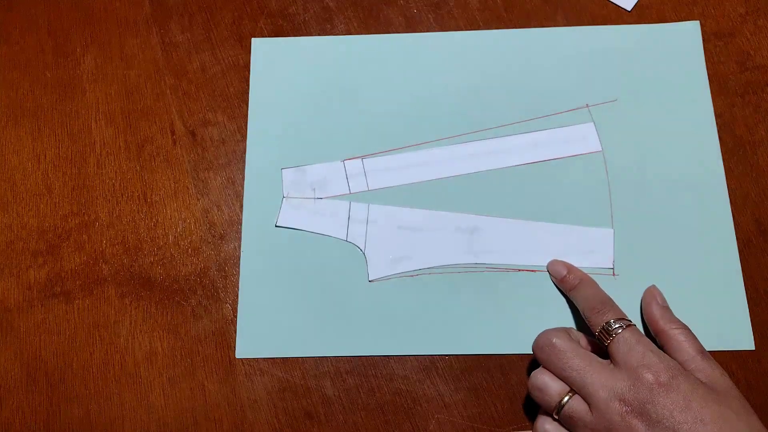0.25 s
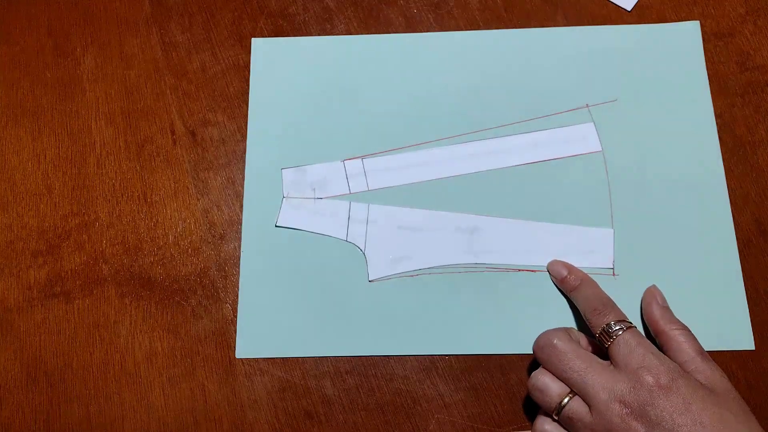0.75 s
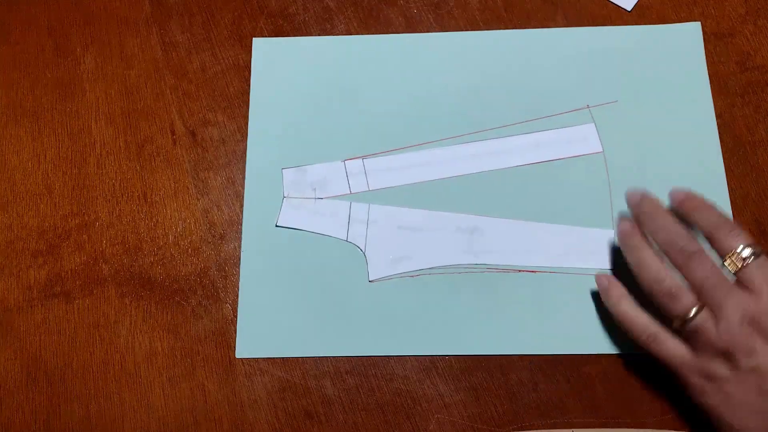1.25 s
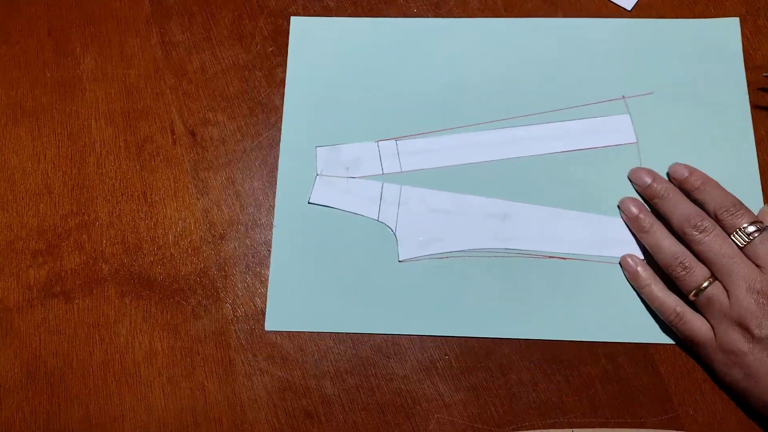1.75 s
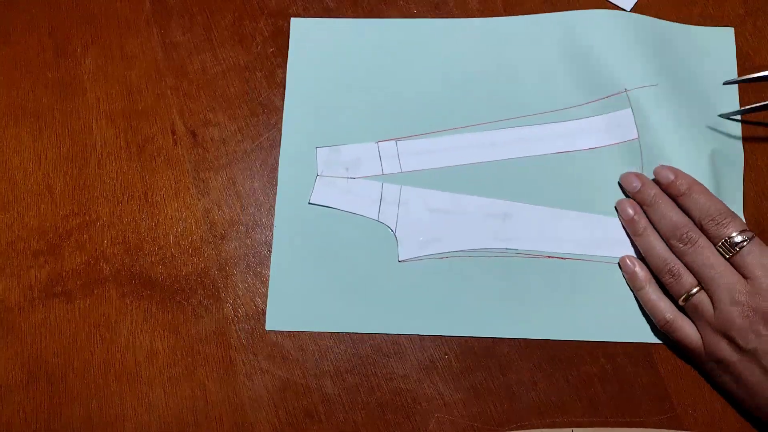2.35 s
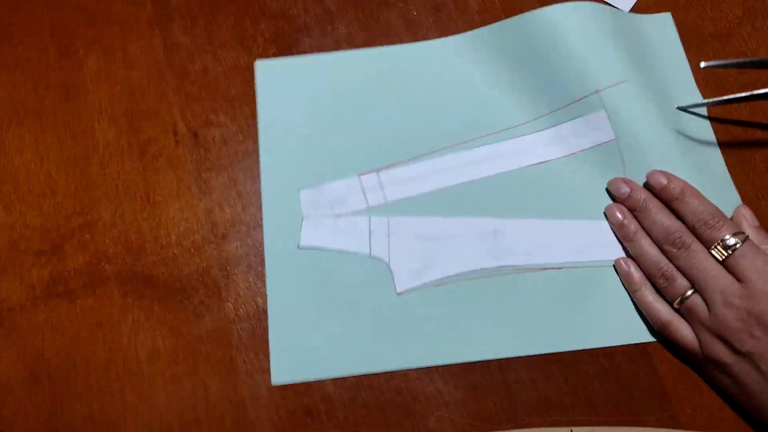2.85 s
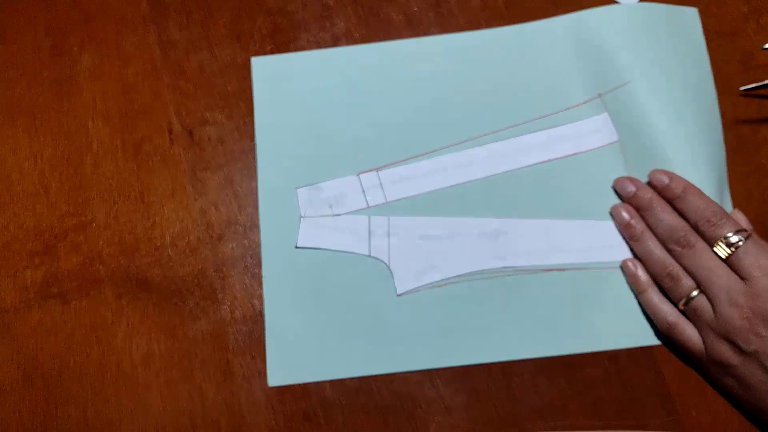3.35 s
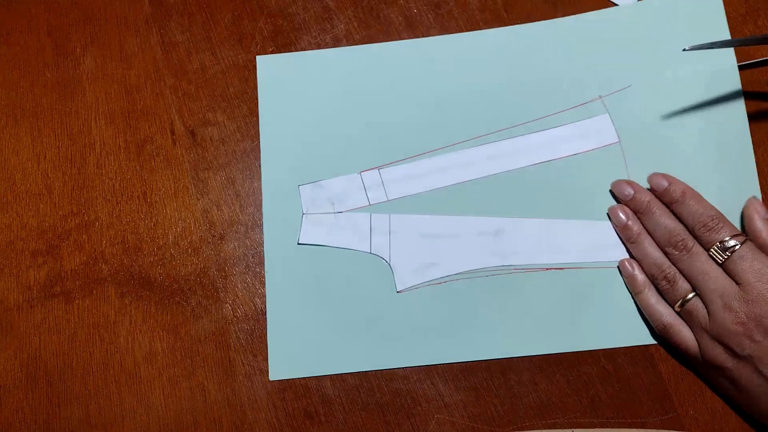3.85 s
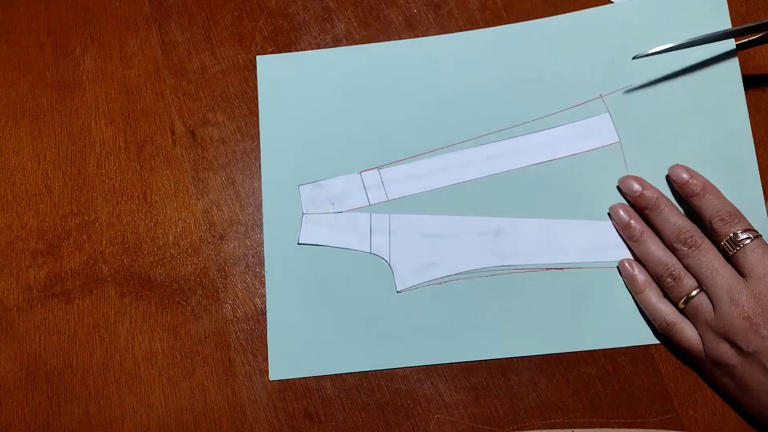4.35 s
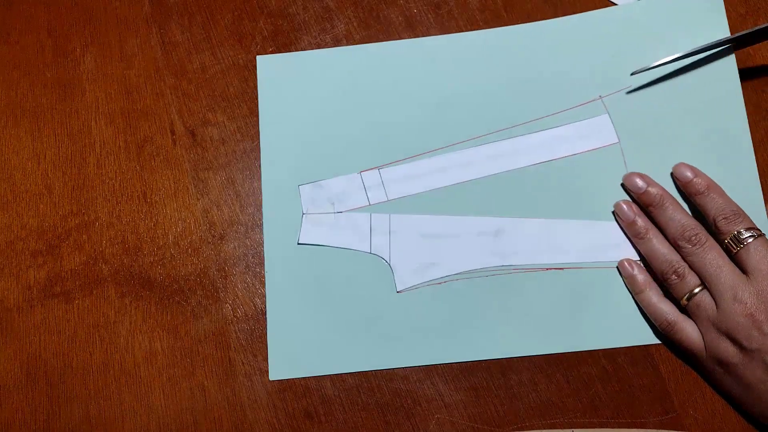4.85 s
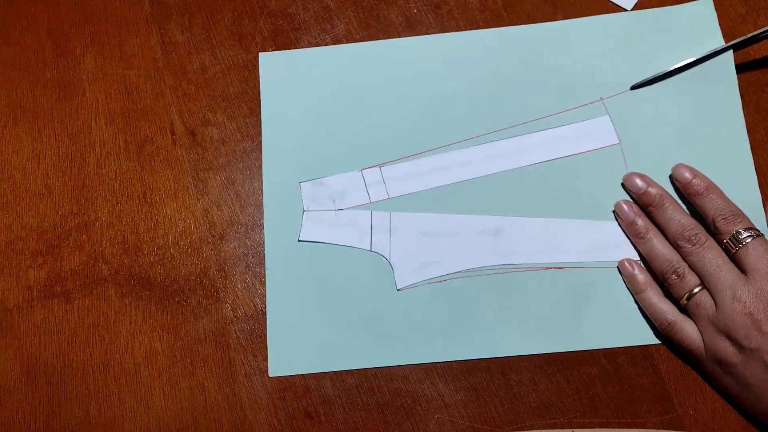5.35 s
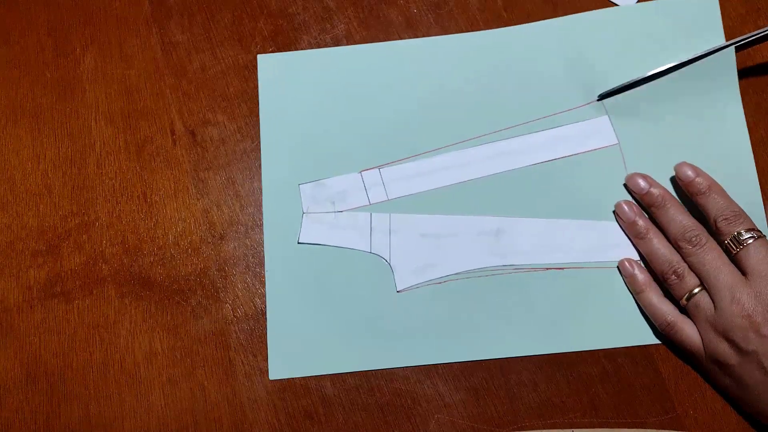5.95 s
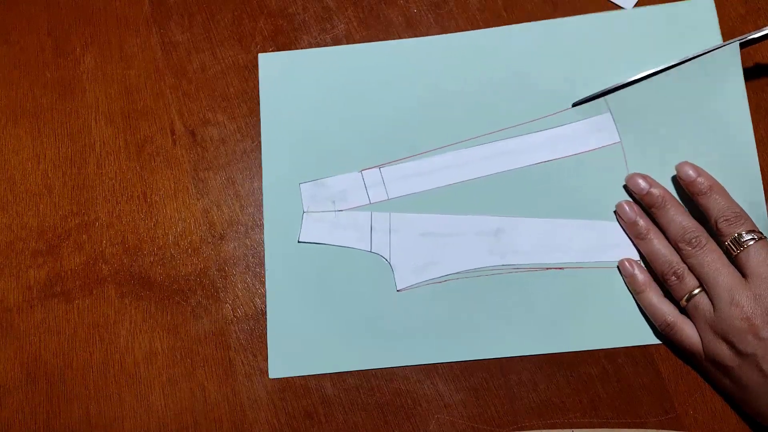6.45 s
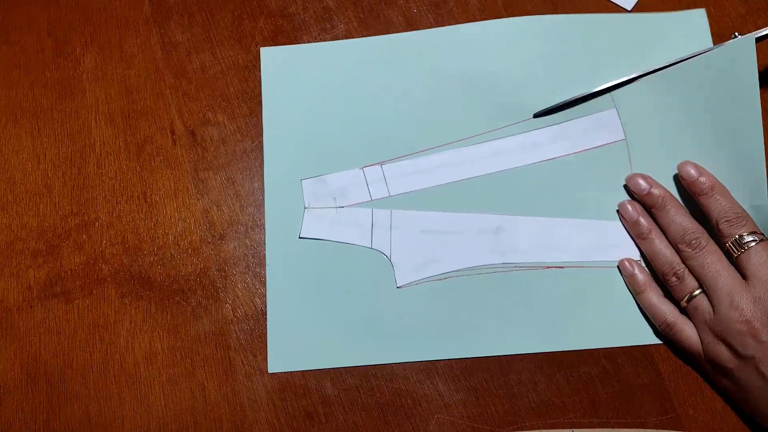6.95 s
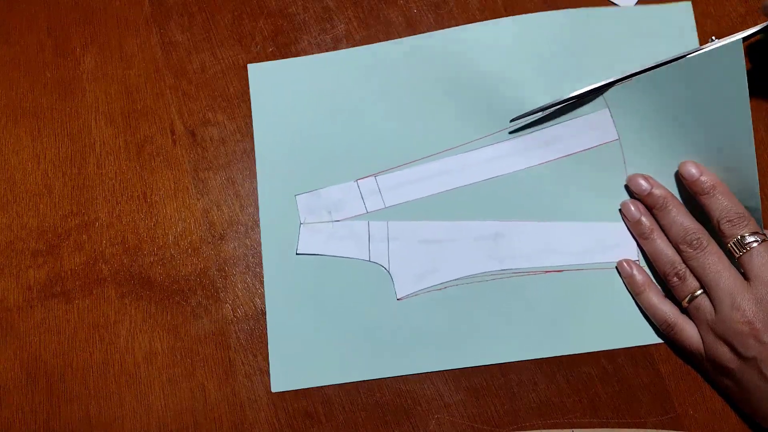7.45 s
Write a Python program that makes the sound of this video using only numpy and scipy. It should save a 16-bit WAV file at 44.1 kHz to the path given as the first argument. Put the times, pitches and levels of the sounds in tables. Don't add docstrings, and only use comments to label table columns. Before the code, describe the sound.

Light knocks and a faint metal clink, papery rustles and a snapping flick, then five spaced scissor snips through stiff paper, close up.

```python
import sys
import numpy as np
from scipy import signal
from scipy.fft import rfft, irfft, next_fast_len
from scipy.io import wavfile

SR = 44100
rng = np.random.default_rng(int(sys.argv[2]) if len(sys.argv) > 2 else 0)


def decibels_to_gain(level_db):
    exponent = np.asarray(level_db, float) / 20
    return 10 ** exponent


def unload_wav(signal):
    wavfile.write(
        sys.argv[1],
        SR,
        np.round(np.clip(np.atleast_2d(signal).T, -1, 1) * 32767).astype(np.int16),
    )


N = 339129
CUT_STARTS_S = 4.7

# frequency [Hz], width [Hz], level [dB].
TABLE_MODES = [(117.7, 12.8, -1), (182, 29, -4), (255.3, 25.4, -0.5), (354, 67, 0.5), (505, 108, -5.5),
               (728, 54, -5.5)]
# frequency [Hz], width [Hz], level [dB].
GRIPPED_MODES = [(983, 260, -2), (1074, 206, 2), (1343, 146, 4.5), (1587, 284, -1.5)]
# frequency [Hz], width [Hz], level [dB].
LOOSE_MODES = [(945, 190, 6.5), (1390, 740, 7), (1843, 330, 13)]
# frequency [Hz], width [Hz], level [dB].
SCRAPE_MODES = [(2140, 2130, -1), (3650, 1970, 5), (5550, 8100, -14)]
# frequency [Hz], width [Hz], level [dB].
FIBRE_MODES = [(7020, 3070, -3), (7980, 1550, 2.5), (9600, 1310, 0.5), (11220, 1300, -0.5),
               (12530, 3800, -10.5)]


def unit(x):
    return x / np.sqrt(np.mean(x ** 2))


def on_log(hz, table):
    f, v = np.transpose(table)
    return np.interp(np.log(np.maximum(hz, 1)), np.log(f), v)


def ports(pan_db):
    return decibels_to_gain(np.multiply.outer([1, -1], np.atleast_1d(pan_db)) / 2)


def body(x, modes):
    def ring(v):
        total = 0
        for k, (hz, width_hz, db) in enumerate(modes):
            b, a = signal.iirpeak(hz, hz / width_hz, SR)
            total = total + (-1) ** k * decibels_to_gain(db) * signal.lfilter(b, a, v)
        return total
    impulse = np.eye(1, 8192)[0]
    return ring(x) / np.sqrt(np.sum(ring(impulse) ** 2))


def grains(rate_hz, spread_db, tail_ms, bed, alike):
    sizes = decibels_to_gain(spread_db * np.minimum(rng.exponential(size=N), 4))
    slips = (rng.random(N) < rate_hz / SR) * sizes
    puffs = signal.lfilter([1], [1, -np.exp(-1e3 / (tail_ms * SR))], slips)
    both, own = rng.standard_normal(N), rng.standard_normal((2, N))
    noise = np.sqrt(alike) * both + np.sqrt(1 - alike) * own
    return unit((bed + unit(puffs)) * noise)


def patchy(parts, depth_db, swells_hz):
    walks = rng.standard_normal((len(parts), int(N / SR * 40)))
    place = np.arange(N) / SR * swells_hz
    total = 0
    for part, walk in zip(parts, walks):
        total = total + part * decibels_to_gain(depth_db * np.interp(place, np.arange(len(walk)), walk))
    return total


def strokes(rows, mix, form):
    onset_ms = 4
    bright_share = np.array((-0.63, -2.55, 0.72, 1))[:, None]
    ms = np.arange(N * 1000 // SR + 1)
    level_db, late_ms, rise_db, fall_db = np.transpose(mix)[:, :, None]
    square, top_pan_db, end_pan_db = form
    power, pan = 0, 0
    for start_s, rise_ms, fall_ms, db, bright_db in rows:
        since = ms - 1e3 * start_s
        top = np.maximum(rise_ms + late_ms, 1)
        to_go = np.clip(1 - since / top, 0, 1)
        fallen = np.maximum(since - top, 0) / fall_ms
        swell_db = -np.abs(rise_db) * to_go ** square - np.abs(fall_db) * fallen ** square
        gain = decibels_to_gain(db + level_db + bright_db * bright_share + swell_db)
        part = (gain * np.clip(1 + since / onset_ms, 0, 1)) ** 2
        power = power + part
        pan = pan + part * (top_pan_db + (end_pan_db - top_pan_db) * np.minimum(fallen, 1))
    return np.array([power, pan])


def background():
    # frequency [Hz], density [dB per Hz].
    air_db = [(2, 4.5), (6, 9), (15, 5), (30, -11.5), (60, -5), (95, -12.5), (180, -13.5), (300, -19.5),
              (700, -26), (2400, -35.5), (4850, -37), (10300, -34.5), (14000, -38.5), (16500, -65)]
    # frequency [Hz], likeness [0-1].
    air_alike = [(10, 0.17), (100, 0.56), (400, 0.33), (1500, 0), (16000, 0)]
    # frequency [Hz], level [dB].
    hum_tones = [(59.2, -48.5), (118.4, -58), (177.6, -57), (473.7, -65), (710.6, -68.5), (1244, -73.5),
                 (1954, -79.5), (3370, -79), (3908, -77)]
    hz = np.arange(N // 2 + 1) * SR / N
    alike = on_log(hz, air_alike)
    noise = rfft(rng.standard_normal((2, N))) * decibels_to_gain(on_log(hz, air_db))
    mid, side = noise * np.sqrt([1 + alike, 1 - alike])
    air = unit(irfft(np.array([mid + side, mid - side]), N)) * decibels_to_gain(-41.53)
    t, hum = np.arange(N) / SR, 0
    for (f, db), waver in zip(hum_tones, rng.standard_normal((len(hum_tones), 80))):
        swing = np.interp(t, np.linspace(0, t[-1], len(waver)), waver)
        hum = hum + decibels_to_gain(db + 3 + 0.8 * swing) * np.sin(2 * np.pi * f * t + f / 600 * swing)
    return air + hum


def room(x):
    # frequency [Hz], decay time t60 [s], level [dB].
    decay = np.array([(199, 0.52, -2), (820, 0.81, -2.5), (2440, 0.64, -2.5), (6700, 0.58, -6),
                      (12900, 0.38, -7.5)])
    t, step = np.arange(SR * 3 // 4) / SR, SR // 2
    starts = range(0, N, step)
    mid, side = rng.standard_normal((2, len(starts), 1, len(t)))
    tail = 0
    for hz in 60 * 2.0 ** np.arange(9):
        edges_hz = [hz / 2 ** 0.5, min(hz * 2 ** 0.5, 20000)]
        band = signal.butter(2, edges_hz, "bandpass", fs=SR, output="sos")
        pair = mid + min((hz / 660) ** 2, 1) * side * np.array([[1], [-1]])
        fade_db = on_log(hz, decay[:, ::2]) - 60 * t / on_log(hz, decay[:, :2])
        tail = -tail + signal.sosfilt(band, pair) * decibels_to_gain(fade_db)
    tail = tail * np.clip((t - 0.004) / 0.001, 0, 1)
    tail = tail / np.sqrt(SR * 0.047)
    out = np.zeros((2, N + SR * 2))
    for at, answer in zip(starts, tail):
        block = x[:, at:at + step].mean(axis=0)[None]
        part = signal.fftconvolve(block, answer, axes=1)
        out[:, at:at + part.shape[1]] += part
    return out[:, :N]


def left_late(x):
    lag_ms = 0.17
    size = next_fast_len(N + 64)
    turn = np.exp(-2j * np.pi * np.arange(size // 2 + 1) / size * lag_ms * SR / 1e3)
    return np.array([irfft(rfft(x[0, :N], size) * turn, size)[:N], x[1, :N]])


def squeak():
    # Start, top and end in seconds.
    squeak_s = (4.03, 4.16, 4.27)
    swell = np.interp(np.arange(N) / SR, squeak_s, [0, 1, 0])
    return decibels_to_gain(-51) * swell * body(grains(120, 2.0, 5.5, 0.36, 0.2), [(3340, 130, 0)])


def steel():
    # start [s], level [dB], left minus right [dB], rise [ms].
    clinks = [
        (0.7689, -45.5, -6.5, 0.17),
        (0.976, -54.5, 4, 17),
        (1.045, -61, -7, 6.1),
    ]
    # frequency [Hz], width [Hz], level [dB].
    blade_modes = [(930, 50, 3), (1300, 24, 9.5), (1950, 67, 5.5), (2530, 48, 6), (3250, 40, -7)]
    t, rattle = np.arange(SR // 4) / SR, np.zeros((2, N))
    for (s, db, pan_db, rise_ms), noise in zip(clinks, rng.standard_normal((len(clinks), len(t)))):
        rise = np.minimum(t * 1e3 / rise_ms, 1)
        fade = np.exp(-t / (0.0023 + rise_ms / 1e3)) + 0.11 * np.exp(-t / 0.08)
        at = int(s * SR)
        rattle[:, at:at + len(t)] += decibels_to_gain(db) * ports(pan_db) * noise * rise * fade
    hardest = rattle * (np.abs(rattle) > 0.3 * np.abs(rattle).max())
    return decibels_to_gain(15.5) * body(rattle, blade_modes) + decibels_to_gain(13.5) * body(hardest, SCRAPE_MODES)


def knocks():
    # start [s], peak [dB], contact time [ms], length [ms], room share [dB].
    knock_rows = [(0.304, -39, 2.1, 4, 10), (.334, -19.5, 0.2, 9.3, 7.5), (.347, -25.5, 0.39, 14, 8),
                  (.363, -23, 0.36, 20, 5), (1.429, -37, 4.1, 3.6, 0.5), (1.988, -41.5, 0.14, 3.9, 18),
                  (2.079, -26, 1.97, 4.8, 7), (3.571, -20.5, 0.58, 2.9, -1), (3.950, -14, 0.33, 9, -3.5),
                  (6.382, -9.5, 1.4, 1.3, -3), (7.567, -33.5, 5, 10, 10)]
    t = np.arange(4096) / SR
    dry, send = np.zeros((2, 2, N + len(t)))
    noises = rng.standard_normal((len(knock_rows), len(t)))
    for (s, db, contact_ms, length_ms, wet_db), noise in zip(knock_rows, noises):
        edges_hz = [70, np.clip(1e3 / contact_ms, 150, 15000)]
        soft = signal.butter(3, edges_hz, "bandpass", fs=SR, output="sos")
        blow = signal.sosfilt(soft, (noise + 1.6 * (t < 0.0006)) * np.exp(-t * 1e3 / length_ms))
        blow = blow + 2.2 * body(blow, TABLE_MODES) * np.sqrt(200 / SR)
        blow = blow * decibels_to_gain(db) / np.abs(blow).max()
        at = slice(int(s * SR), int(s * SR) + len(t))
        dry[:, at] += blow
        send[:, at] += blow * decibels_to_gain(wet_db)
    return dry[:, :N], send[:, :N]


def snaps():
    # start [s], peak [dB], left minus right [dB], length [ms].
    ticks = [(1.2757, -38, -12, 2.8), (1.4052, -38, -10, 1.8), (1.4293, -33.5, -2, 4.2),
             (2.7022, -35, -11, 3.4), (3.1775, -37, -2, 3.2), (3.2044, -39, -11, 5.2),
             (3.7724, -14, -6.5, 5.4), (3.7952, -19, -18, 1.4), (3.8121, -24, 9, 2.1)]
    # start [s], peak [dB], left minus right [dB], length [ms].
    nips = [(5.0749, -35.5, -7, 5.8), (5.108, -42, -5, 3.1), (5.150, -34.5, 2, 2.1), (5.187, -39, 2, 4.2),
            (5.2531, -32.5, 1, 13), (5.4712, -28.5, 1.5, 4.3), (5.8168, -14.5, -2.5, 2.1),
            (5.8346, -13, -7, 1.3), (5.8488, -20, -11, 3.4), (5.8644, -9.5, -2, 0.99),
            (6.018, -31, -20, 1.3), (6.2925, -21, -8, 2.5), (6.3806, -13.5, -7, 2.7),
            (6.51, -20.5, -5.5, 1.35), (7.1543, -27, 6, 4.1), (7.452, -41.5, -8.5, 8.8)]
    # start [s], peak [dB], left minus right [dB], length [ms].
    creases = [(2.6066, -32.5, -4, 5.7), (2.7885, -46, -1, 4.6), (2.850, -40.5, -2, 3),
               (2.8703, -39.5, 6, 2.2), (6.3118, -21.5, 3, 2.6), (6.8773, -27.5, -4, 3.8),
               (6.9076, -20, -2, 2.7), (7.2616, -31, -4, 4)]
    # start [s], peak [dB], left minus right [dB], length [ms].
    thuds = [(.3456, -26, -3, 3.2), (1.986, -32, -4.5, 2.7), (5.1863, -34, 1, 2.7), (5.3154, -26.5, 4, 6.1),
             (5.886, -26, 0, 8.4), (5.9041, -21, 2, 3.3), (6.3629, -27, 0, 1), (6.9177, -21.5, 2, 4.6),
             (6.935, -18.5, -7, 2), (7.538, -31.5, -1, 9), (7.6128, -32.5, 2, 3.9), (7.673, -32, 1, 4.4)]
    kinds = ((ticks, (0, -32, -22.5)), (nips, (0, -17, -6)),
             (creases, (-31, -12, 0)), (thuds, (-1.5, 0, -6.5)))
    t = np.arange(2048) / SR
    push, crack, spit = np.zeros((3, 2, N + len(t)))
    for rows, (fibre_db, table_db, sheet_db) in kinds:
        noises = rng.standard_normal((len(rows), 4, len(t)))
        for (s, db, pan_db, length_ms), (shove, both, *own) in zip(rows, noises):
            at = slice(int(s * SR), int(s * SR) + len(t))
            shape = np.minimum(t * 1e3 / (0.85 * length_ms), 1) * np.exp(-t * 1e3 / length_ms)
            burst = ports(pan_db) * (both + 1.45 * np.array(own)) * shape
            shove = np.abs(shove) * np.exp(-t / 0.00051)
            push[:, at] += ports(0.37 * pan_db) * decibels_to_gain(db + table_db) * shove
            crack[:, at] += decibels_to_gain(db + sheet_db + 9.5) * burst
            spit[:, at] += decibels_to_gain(db + fibre_db) * burst
    gripped = np.arange(N + len(t)) > CUT_STARTS_S * SR
    loose = body(crack * ~gripped, [*LOOSE_MODES, (2930, 1540, 3)])
    held = decibels_to_gain(-9.5) * body(crack * gripped, [*GRIPPED_MODES, (2530, 1200, -5)])
    fibres = body(spit, [(3910, 380, -4.5), *FIBRE_MODES])
    return body(push, TABLE_MODES) + loose + held + fibres


def drags():
    # start [s], rise [ms], fall [ms], level [dB], brightness [dB].
    drag_rows = [(0.55, 150, 250, -58, -1), (1.99, 16, 90, -46, -0.56), (2.08, 107, 105, -35.5, 1.3),
                 (3.565, 8.8, 98, -42, -4.6), (3.95, 6.7, 87, -36, -4.8), (4.12, 61, 122, -43, 0.65),
                 (4.3, 50, 590, -55.5, 1.8)]
    # level [dB], lateness [ms], rise depth [dB], fall depth [dB].
    drag_mix = [(1, -47, 27, 13.3), (-9.5, -10, 7, 16), (-11.5, -7, 17, 14), (-6.5, -7, 26, 31)]
    return strokes(drag_rows, drag_mix, (2.77, -8, -1))


def brushes():
    # start [s], rise [ms], fall [ms], level [dB], brightness [dB].
    brush_rows = [(0.60, 40.8, 39, -40, -7), (1.41, 74.5, 69, -51, 13.5), (1.59, 40, 60, -60, 12),
                  (2.22, 52.6, 90, -23.5, -4), (3.17, 25, 104, -34.5, -1.5), (3.31, 99, 153, -33.5, -4.5)]
    # level [dB], lateness [ms], rise depth [dB], fall depth [dB].
    brush_mix = [(-29, 0, 2.6, 29), (-26.5, 0, 6.9, 20), (-13, 0, 22, 7.2), (-3, 0, 17, 16.5)]
    return strokes(brush_rows, brush_mix, (1.55, -2.5, -3))


def flexes():
    # start [s], rise [ms], fall [ms], level [dB], brightness [dB].
    flex_rows = [(2.40, 66, 80, -39, 0.83), (2.703, 79, 35, -35, 0.37), (2.80, 79, 60, -39.5, 3.9),
                 (2.932, 13, 32.8, -29, 2.9), (4.02, 147, 134, -47, -0.45)]
    # level [dB], lateness [ms], rise depth [dB], fall depth [dB].
    flex_mix = [(-19.5, -12, 18, 14), (2, -20, 12, 34), (-4, 10.5, 11.4, 54), (0.5, -6, 14, 21)]
    return strokes(flex_rows, flex_mix, (2.74, -4, -2.4))


def whips():
    # start [s], rise [ms], fall [ms], level [dB], brightness [dB].
    whip_rows = [
        (0.96, 35, 90, -46, 1),
        (2.62, 16, 91, -52, -2),
        (3.755, 49, 123, -28, 0.9),
    ]
    # level [dB], lateness [ms], rise depth [dB], fall depth [dB].
    whip_mix = [(-33, 0, 6, 10), (-33, -33, 8, 31), (4, -9, 23, 24), (3, 19, 15, 29)]
    return strokes(whip_rows, whip_mix, (0.68, -3.5, 0))


def skids():
    # start [s], rise [ms], fall [ms], level [dB], brightness [dB].
    skid_rows = [
        (5.49, 60.3, 89, -33.5, 0),
        (6.08, 86, 59.3, -32.5, 0),
        (6.56, 100, 85, -30, 0),
        (7.09, 79.5, 90, -34.5, 0),
    ]
    # level [dB], lateness [ms], rise depth [dB], fall depth [dB].
    skid_mix = [(0, 0, 5.8, 13)]
    return np.sqrt(strokes(skid_rows, skid_mix, (2.2, 0, 0))[0, 0])


def pushes():
    # start [s], rise [ms], fall [ms], level [dB], brightness [dB].
    push_rows = [
        (5.47, 101.5, 183, -36, -0.15),
        (6.03, 135, 125, -32.5, 0.89),
        (6.51, 111, 129.6, -34.5, 0.068),
        (7.09, 58.6, 144, -34.5, -0.14),
    ]
    # level [dB], lateness [ms], rise depth [dB], fall depth [dB].
    push_mix = [(-8, 6.5, 2.9, 23), (-10, -54, 3.7, 21), (-5.5, -6, 3.7, 9.5), (-2.5, -1, 6.2, 16)]
    return strokes(push_rows, push_mix, (3.13, -3, -5.5))


def cuts():
    # start [s], rise [ms], fall [ms], level [dB], brightness [dB].
    cut_rows = [
        (5.06, 257, 61, -32, -1.5),
        (5.815, 74, 87, -29, -1.5),
        (6.30, 54.3, 120, -26.5, -1.5),
        (6.85, 59, 107, -32, -2.5),
        (7.53, 510, 90, -31, -1.5),
    ]
    # level [dB], lateness [ms], rise depth [dB], fall depth [dB].
    cut_mix = [(4.5, 11.5, 18.5, 19), (2, 11, 25.5, 39), (1, -2, 23.5, 20), (5, -24, 27.5, 27)]
    return strokes(cut_rows, cut_mix, (0.81, -4.5, -0.83))


def rubbing():
    # frequency [Hz], width [Hz], level [dB].
    skid_modes = [(370, 167, 1), (706, 110, -13.5)]
    t = np.arange(N) / SR

    def per_sample(curve):
        return np.interp(t * 1e3, np.arange(len(curve)), curve)

    power, pan = cuts() + pushes() + brushes() + flexes() + drags() + whips()
    table_gain, sheet_gain, scrape_gain, fibre_gain = [per_sample(g) for g in np.sqrt(power)]
    pan_db = per_sample(pan.sum(axis=0) / (power.sum(axis=0) + 1e-12))
    coarse = grains(400, 3.0, 3.2, 0.65, 0.85)
    fine = grains(260, 2.8, 3.5, 1.1, 0.25)

    def tear(modes):
        parts = []
        for k, (hz, width_hz, db) in enumerate(modes):
            gain = (-1) ** k * decibels_to_gain(db) * np.sqrt(width_hz)
            parts.append(gain * body(fine, [(hz, width_hz, 0)]))
        return unit(patchy(parts, 1.6, 22))

    loose = body(coarse, LOOSE_MODES)
    gripped = body(body(coarse, GRIPPED_MODES), [(1450, 3500, 0)])
    sheet = unit(np.where(t < CUT_STARTS_S, loose, gripped))
    paper = sheet_gain * sheet + scrape_gain * tear(SCRAPE_MODES) + fibre_gain * tear(FIBRE_MODES)
    shake = coarse.mean(axis=0)
    table = table_gain * unit(body(body(shake, TABLE_MODES), [(310, 1240, 0)]))
    table = table + per_sample(skids()) * unit(body(body(shake, skid_modes), skid_modes))
    return decibels_to_gain(-2) * (paper * ports(pan_db) + table * ports(1.12 * pan_db))


def scene():
    knock, far = knocks()
    near = rubbing() + snaps()[:, :N] + steel() + squeak()
    return left_late(near + knock) + decibels_to_gain(-3) * room(near + far) + background()


def roll_off(x):
    return signal.sosfilt(signal.butter(12, 16810, fs=SR, output="sos"), x)


def record(dry):
    low_pass = signal.ellip(6, 0.3, 26, 15800, fs=SR, output="sos")
    heard = signal.sosfilt(low_pass, dry)
    return roll_off(np.tanh(heard * 1.187) / 0.96 - 0.0005)


dry = scene()
out = record(dry)
unload_wav(out)
```